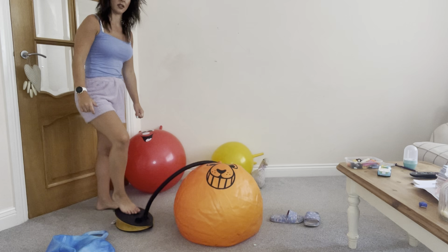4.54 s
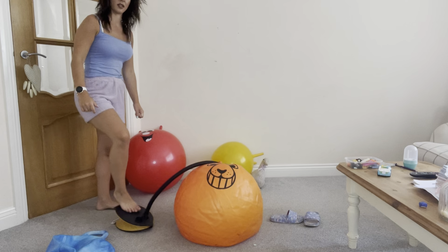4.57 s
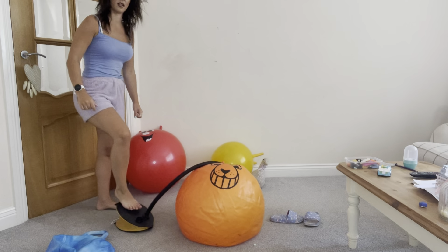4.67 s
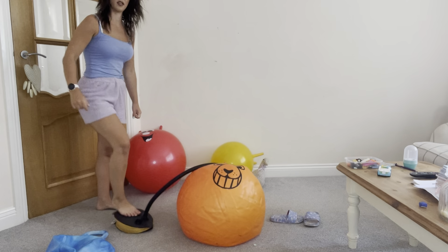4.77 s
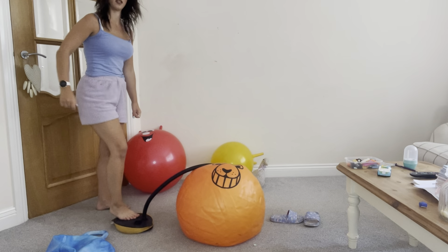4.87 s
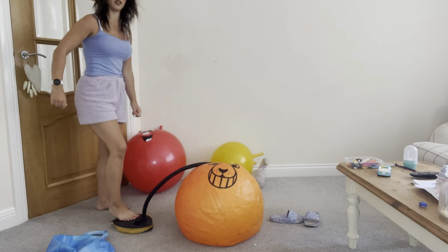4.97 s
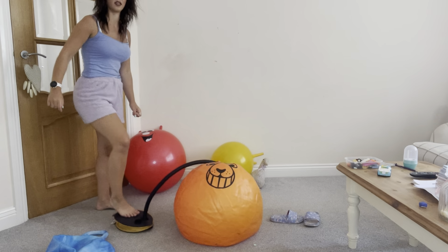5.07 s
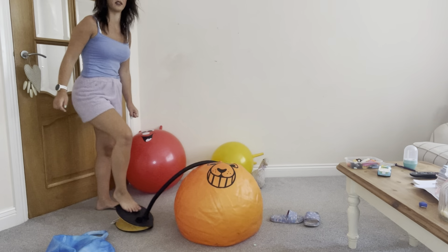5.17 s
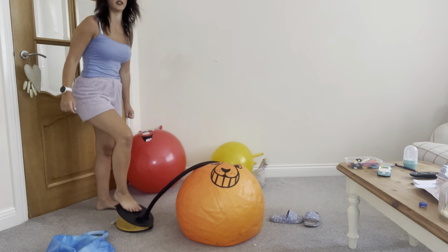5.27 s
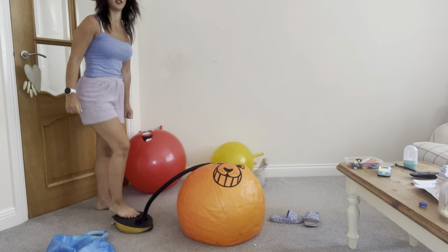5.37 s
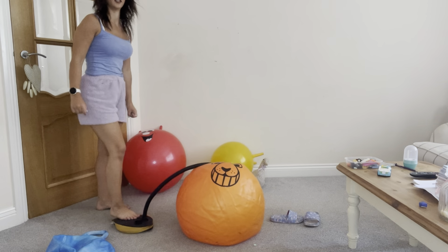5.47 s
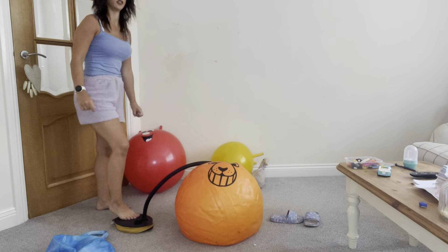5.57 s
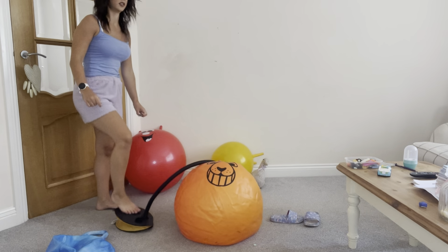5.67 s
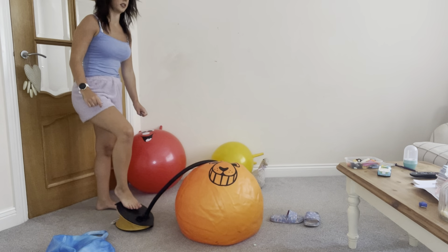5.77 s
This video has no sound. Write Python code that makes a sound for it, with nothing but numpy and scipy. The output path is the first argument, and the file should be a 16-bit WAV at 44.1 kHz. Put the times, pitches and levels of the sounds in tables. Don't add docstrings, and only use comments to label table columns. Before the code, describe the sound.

A foot-operated bellows pump is heard close up in a small carpeted, furnished room with a short reverberation. The rhythm is already under way: presses land at about 0.1, 0.7, 1.3, 1.9, 2.4, 3.0, 3.6, 4.1, 4.7 and 5.3 seconds. Each begins with a blunt hollow knock, mostly low-mid and boxy, with a short rattle and a dull floor thump, while a small puff opens into a bright, steady hiss lasting roughly a quarter second. Between them, from about 0.4 until 5.6 seconds, each release brings a softer snap of folds and a hollow, lumpy whoosh of air sucked in, duller and lower than the outgoing hiss. Stamps vary slightly; the one near 3.0 is hardest, with the loudest outgoing puff, and the puff at 1.9 is faint. The pump sits a little left in stereo over faint low house noise, with pumping continuing to the end.

```python
import sys
import numpy as np
from scipy import signal
from scipy.fft import rfft, irfft, next_fast_len
from scipy.io import wavfile

SR = 44100
rng = np.random.default_rng(int(sys.argv[2]) if len(sys.argv) > 2 else 0)


def elevation(decibels):
    levels = np.asarray(decibels, float)
    return 10 ** (levels / 20)


def transcribe(signal):
    frames = np.atleast_2d(signal).T
    limited = np.clip(frames, -1, 1)
    pcm = np.round(limited * 32767).astype(np.int16)
    wavfile.write(sys.argv[1], SR, pcm)


N = 257103

# f/Hz, bandwidth/Hz, level/dB
CAVITY_MODES = [(249, 44.6, 1), (382, 61, -4.5), (431.6, 79, -3.5), (565, 48, -2.5), (684, 129, -6.5),
                (796.6, 78, -3.5), (941, 30, -10), (1145, 144, -12.5), (1380, 148, -14.5), (1957, 255, -18),
                (1914, 168, -19)]
# f/Hz, T60/s
REVERBERATION = [(100, 0.61), (500, 0.19), (2000, 0.2), (8000, 0.21), (16000, 0.12)]
# outlet flap opens t/s, stamp level/dB, flap puff peak level/dB, push level/dB,
# stroke length/usual length
DOWN_STROKES = [
    (0.068, -1.5, -30.5, -0.5, 1.146),
    (0.6694, -1, -28, 0.5, 1.04),
    (1.284, 0, -27.5, 0, 1.01),
    (1.872, -1, -36.5, -0.5, 1.09),
    (2.4433, 2.5, -28, -0.5, 1.035),
    (3.018, 4.5, -25.5, -0.5, 1.05),
    (3.563, 1, -31, 0, 1.01),
    (4.124, 1, -29.5, 0, 1.045),
    (4.712, -1, -31, -0.5, 1.034),
    (5.285, 1.5, -28.5, -1.5, 1.016),
]
# inlet flap opens t/s, gulp level/dB, flap puff peak level/dB, suction level/dB,
# lead of the folds over the flap t/s
UP_STROKES = [(-0.15, -3.5, -40, -1, 0.03), (0.4355, -0.5, -49, -1, 0.05), (1.062, -2.5, -24, -0.5, 0.069),
              (1.6496, -2, -26.5, -1, 0.045), (2.233, -1.5, -27.5, -1, 0.062), (2.8, -2, -36, 0, 0.049),
              (3.3474, -3.5, -29.5, -3.5, 0.048), (3.901, -1, -34.5, -1.5, 0.049),
              (4.491, -4, -30, -1.5, 0.055), (5.0544, -2, -47, -4, 0.032), (5.6116, -7, -30, -1, 0.018)]


def rms_one(x):
    return x / np.sqrt(np.mean(x ** 2) + 1e-20)


def envelope(rows):
    s, level_db = np.transpose(rows)
    return elevation(np.interp(np.arange(N) / SR, s, level_db))


def at_hz(points, hz):
    f, value = np.array(points)[:, :2].T
    return np.interp(np.log(np.maximum(hz, 1)), np.log(f), value)


def drift(rate):
    every = 40
    r = np.exp(-2 * every * np.pi * rate / SR)
    settle = 2000
    slow = signal.lfilter([1], [1, -2 * r, r * r], rng.standard_normal(N // every + settle + 2))
    slow = rms_one(slow[settle:])
    return np.interp(np.arange(N) / every, np.arange(len(slow)), slow)


def resonate(x, hz, width):
    r = np.exp(-np.pi * width / SR)
    poles = [1, -2 * r * np.cos(2 * np.pi * hz / SR), r * r]
    return signal.lfilter(np.array([1, 0, -1]) * (1 - r * r) / 2, poles, x + 1e-18)


def coloured(x, spectrum):
    size = next_fast_len(N)
    gain = elevation(at_hz(spectrum, np.fft.rfftfreq(size, 1 / SR)))
    return rms_one(irfft(rfft(x, size) * gain, size)[:N])


def swell(start_s, strength_db, delay_s, peak_db, rise_db, attack_s, hold_s, fall_db, bend,
          ease=2, pace=1, early_s=0):
    t = np.arange(0, N / SR + .01, .002)[:, None]
    t = (t - start_s - delay_s + early_s) / pace
    attack = attack_s + early_s
    silence = 8000 * np.maximum(-t, 0)
    rising = rise_db * np.clip(1 - t / attack, 0, 1) ** ease + silence
    falling = fall_db * (10 * np.maximum(t - attack - abs(hold_s), 0)) ** bend
    return np.sum(elevation(2 * (peak_db + strength_db - rising - falling)), axis=1)


def as_rows(power):
    return np.transpose([.002 * np.arange(len(power)), 10 * np.log10(power + 1e-11)])


def strokes():
    down, stamp_db, _, push_db, pace = np.transpose(DOWN_STROKES)
    up, gulp_db, _, suck_db, early = np.transpose(UP_STROKES)

    stamp = dict(delay_s=-0.018, peak_db=-27.5, rise_db=22, attack_s=0.023, hold_s=0.034,
                 fall_db=29, bend=0.84, ease=1.2)
    squeeze = dict(delay_s=0.037, peak_db=-39, rise_db=0, attack_s=0.045, hold_s=0.043,
                   fall_db=12.5, bend=0.53)
    gulp = dict(delay_s=-0.0059, peak_db=-26, rise_db=20.5, attack_s=0.024, hold_s=0.0098,
                fall_db=10.5, bend=1, ease=1.67)
    cavity = swell(down, stamp_db, **stamp)
    cavity += swell(down, push_db, **squeeze, pace=pace)
    cavity += swell(up, gulp_db, **gulp, early_s=abs(early))

    outlet = dict(delay_s=0.0024, peak_db=-38, rise_db=19.5, attack_s=0.1, hold_s=0.035,
                  fall_db=6.5, bend=0.86)
    inlet = dict(delay_s=-0.0078, peak_db=-38, rise_db=13, attack_s=0.023, hold_s=0.039,
                 fall_db=12.5, bend=1.86)
    valve = swell(down, push_db, **outlet, pace=pace) + swell(up, suck_db, **inlet)

    blow = dict(delay_s=0.0016, peak_db=-37.5, rise_db=31.5, attack_s=0.098, hold_s=0.062,
                fall_db=15.5, bend=1.02)
    backdraught = dict(delay_s=-0.005, peak_db=-52, rise_db=12.5, attack_s=0.082, hold_s=0.0075,
                       fall_db=23, bend=0.93)
    jet = swell(down, push_db, **blow, pace=pace) + swell(up, suck_db, **backdraught)

    heel_down = dict(delay_s=-0.007, peak_db=-38, rise_db=15, attack_s=0.051, hold_s=0.025,
                     fall_db=14.5, bend=0.44)
    heel_up = dict(delay_s=-0.039, peak_db=-36.5, rise_db=29, attack_s=0.069, hold_s=0.047,
                   fall_db=11.5, bend=1.04)
    floor = swell(down, 0.11 * stamp_db, **heel_down) + swell(up, 1.2 * gulp_db, **heel_up)

    drone_down = dict(delay_s=-0.013, peak_db=-50.5, rise_db=-3, attack_s=0.1, hold_s=0.059,
                      fall_db=0.5, bend=1.7)
    drone_up = dict(delay_s=0.014, peak_db=-44, rise_db=27, attack_s=0.068, hold_s=0.018,
                    fall_db=10.5, bend=1.5)
    drone = swell(down, 1.4 * stamp_db, **drone_down) + swell(up, 0.7 * gulp_db, **drone_up)
    return [as_rows(power) for power in (cavity, valve, jet, floor, drone)]


def background():
    # f/Hz, spectral density level/dB
    house_spectrum = [(18, -33), (30, 30), (65, 22), (311, 35), (393, 22), (786, 32), (3870, -48),
                      (7360, -36), (14000, -59)]
    mid = coloured(rng.standard_normal(N), house_spectrum)
    side = coloured(rng.standard_normal(N), house_spectrum)
    return elevation(-54) * np.array([mid + 0.8 * side, mid - 0.37 * side])


def rumble(rows, modes, lumpy_db):
    shake = rng.standard_normal(N) * elevation(lumpy_db * drift(19))
    ringing = 0
    for hz, width, db in modes:
        ringing = ringing + elevation(db) * resonate(resonate(shake, hz, width), hz, 3 * width)
    return envelope(rows) * rms_one(ringing)


def room_drone(drone_db):
    # f/Hz, bandwidth/Hz, level/dB
    room_modes = [(45.6, 19.6, 2.5), (62, 3, 6.5)]
    drone = rumble(drone_db, room_modes, lumpy_db=-1.5)
    across = elevation(-13) * rumble(drone_db, room_modes, lumpy_db=-5) * np.array([[1], [-1]])
    return drone, across


def floor_thud(floor_db):
    # f/Hz, bandwidth/Hz, level/dB
    floor_modes = [(110, 87, 6.5), (134.2, 20, 4.5)]
    return rumble(floor_db, floor_modes, lumpy_db=1.5)


def turbulence(rows, spectrum, patchy_db, rate):
    # f/Hz, level re direct/dB
    echo_level = [(1000, 4), (3000, 5), (5500, 3), (7000, -5), (8000, -6), (16000, -4)]
    size = next_fast_len(N)
    noise = np.array([rfft(coloured(white, spectrum), size) for white in rng.standard_normal((3, N))])
    half_octave = 2 * np.log2(np.fft.rfftfreq(size, 1 / SR) + 1)
    together = drift(rate)
    effort = envelope(rows)
    direct, echo = 0, 0
    for band in range(18, 29):
        crossfade = np.clip(1 - abs(half_octave - band), 0, 1)
        part = irfft(noise * crossfade, size)[:, :N]
        gain = effort * elevation(patchy_db * (together + 0.86 * drift(rate)))
        hz = 2 ** (band / 2)
        keep = elevation(-120 / at_hz(REVERBERATION, hz) / SR)
        stored = signal.lfilter([1 - keep], [1, -keep], gain ** 2)
        direct = direct + part[0] * gain
        echo = echo + part[1:] * np.sqrt(stored) * elevation(at_hz(echo_level, hz))
    return direct, echo


def nozzle_jet(jet_db):
    # f/Hz, spectral density level/dB
    jet_spectrum = [(2000, -6.5), (4000, -2), (6000, 2.5), (6900, 4.5), (7350, -2.5), (7900, 4.5),
                    (10500, 5), (12500, 3), (15000, 1), (17000, -23)]
    return turbulence(jet_db, jet_spectrum, patchy_db=0.47, rate=35)


def valve_hiss(valve_db):
    # f/Hz, spectral density level/dB
    valve_spectrum = [(700, -6), (1200, 1), (1650, 0), (1870, 4.5), (2100, -1.5), (2300, -2.5),
                      (2480, -1.5), (2700, -2.5), (3500, -3), (4500, -3), (4900, -8), (7000, -8),
                      (9000, -24)]
    return turbulence(np.add(valve_db, [0, -5]), valve_spectrum, patchy_db=1.68, rate=6.2)


def flaps():
    # f/Hz, spectral density level/dB
    puff_spectrum = [(1200, 11), (2200, 4.5), (4500, 0), (6000, -4), (10000, -8.5), (16000, -25)]
    puffs = 0
    for rows, decay_ms in (DOWN_STROKES, 19.6), (UP_STROKES[1:], 30):
        s, _, db, *_ = np.transpose(rows)
        kicks = np.zeros(N) + 1e-18
        kicks[np.round(s * SR).astype(int)] = elevation(db - 7)
        puffs = puffs + signal.lfilter([1], [1, -np.exp(-1000 / decay_ms / SR)], kicks)
    opens_ms = 1.55
    lag = np.exp(-1000 / opens_ms / SR)
    return signal.lfilter([1 - lag], [1, -lag], puffs) * coloured(rng.standard_normal(N), puff_spectrum)


def inlet_opening(s, level_db):
    since = s[:, None] - np.array(UP_STROKES)[:, 0]
    fade_s = 0.029
    fresh = np.sum((since > 0) * np.exp(-abs(since) / fade_s), axis=1)
    return np.clip(-1 - 0.22 * (level_db + 35.5) + 5.5 * fresh, -8, 12)


def cavity_air(rows, lumpy_db, wander_db):
    s, level_db = np.transpose(rows)
    opening = np.interp(np.arange(N) / SR, s, inlet_opening(s, level_db))
    flow = rng.standard_normal(N) * elevation(lumpy_db * drift(50))
    flow = signal.sosfilt(signal.butter(2, 2700, fs=SR, output="sos"), flow)
    whoosh = 0
    for k, (hz, width, db) in enumerate(CAVITY_MODES):
        wander = wander_db * np.tanh(drift(12.7))
        gain = elevation(db + wander + opening * np.log2(hz / 400))
        whoosh = whoosh + (-1) ** k * gain * resonate(flow, hz, max(width, hz / 9))
    return envelope(rows) * elevation(-1.5) * whoosh / 0.12


def knocks(favour_db):
    # t/s, peak level/dB, strongest ring f/Hz, rattle t/ms
    press_snaps = [(0.077, -14, 535, 10), (0.662, -19, 276, 6), (0.676, -23, 280, 6.8),
                   (0.708, -15, 300, 3), (1.281, -22, 700, 7), (1.290, -15.5, 474, 3.1),
                   (1.854, -24.5, 740, 5.1), (1.873, -17.5, 229, 2.3), (2.453, -19.5, 714, 21),
                   (2.486, -21.5, 300, 3.5), (3.000, -21.5, 526, 4.9), (3.023, -9.5, 398, 8.5),
                   (3.046, -21, 820, 2.6), (3.563, -20, 560, 5), (3.571, -13.5, 525, 7.6),
                   (4.123, -24, 420, 10), (4.131, -17.5, 300, 9), (4.161, -12, 425, 2.8),
                   (4.701, -26, 756, 6.8), (4.717, -14.5, 400, 8), (4.749, -18.5, 258, 4.6),
                   (5.278, -18.5, 760, 6), (5.287, -14, 530, 12)]
    # t/s, peak level/dB, strongest ring f/Hz, rattle t/ms
    release_snaps = [(0.452, -16.5, 406, 7.6), (1.026, -32, 467, 11), (1.059, -18.5, 795, 5.1),
                     (1.159, -25.5, 226, 4.4), (1.621, -26.5, 455, 6), (1.631, -20.5, 468, 6.9),
                     (1.668, -13.5, 256, 8), (2.221, -23.5, 256, 6.6), (2.248, -14, 540, 5.2),
                     (2.770, -29, 471, 3.9), (2.822, -18.5, 560, 5.1), (3.316, -23, 280, 11),
                     (3.366, -14.5, 550, 5.9), (3.869, -26, 554, 4.5), (4.485, -24, 470, 4.4),
                     (4.515, -24, 695, 8.3), (5.029, -27.5, 616, 6.8), (5.084, -16.5, 530, 8),
                     (5.586, -25.5, 470, 9.2), (5.635, -17.5, 453, 13)]
    t = np.arange(int(.07 * SR)) / SR
    out = np.zeros(N + len(t))
    blunt = signal.butter(2, 1650, fs=SR, output="sos")
    fade = np.cos(t / t[-1] * np.pi / 2)
    for s, db, ring_hz, rattle_ms in press_snaps + release_snaps:
        push, chance = rng.standard_normal((2, len(t)))
        push = push * (abs(chance) > 2.2)
        push[0] = 2.25
        push = push * np.exp(-t * 1000 / np.clip(rattle_ms, 1, 20))
        push = signal.sosfilt(blunt, push)
        body = 0
        for k, (hz, width, mode_db) in enumerate(CAVITY_MODES):
            favour = favour_db * np.exp(-(np.log(hz / ring_hz) / .22) ** 2)
            body = body + (-1) ** k * elevation(mode_db + favour) * resonate(push, hz, 1.4 * width)
        i = round(s * SR)
        out[i:i + len(t)] += elevation(min(db, -6.5) - 2.1) * body * fade / abs(body).max()
    return out[:N]


def heard(solid, air):
    # f/Hz, level re direct/dB
    tail_level = [(100, -27), (400, -0.5), (1500, 0.5), (5000, -9), (12000, 2)]
    # f/Hz, left-right level/dB
    left_bias = [(60, 3), (125, 3), (300, 3.3), (700, 3.5), (2000, 2.5), (8000, -0.5)]
    size = next_fast_len(N + SR)
    hz = np.fft.rfftfreq(size, 1 / SR)
    t = np.arange(SR // 2) / SR
    tails = 0
    octaves = 60 * 2. ** np.arange(9)
    for low, high in zip(octaves, octaves[1:]):
        mid_hz = np.sqrt(low * high)
        bandpass = signal.butter(2, [low, high], "band", fs=SR, output="sos")
        band = signal.sosfilt(bandpass, rng.standard_normal((2, len(t))))
        tail = band * elevation(-60 * t / at_hz(REVERBERATION, mid_hz)) * (t > .004)
        energy = np.sum(tail ** 2, axis=1, keepdims=True)
        share = (high - low) / SR * 2
        tails = tails + tail * elevation(at_hz(tail_level, mid_hz)) * np.sqrt(share / energy)
    bias = elevation(at_hz(left_bias, hz) / 2)
    solid_lag_s, air_lag_s = 58e-6, 82e-6
    solid_path = np.array([bias, np.exp(-2j * np.pi * hz * solid_lag_s) / bias])
    air_path = np.array([bias, np.exp(-2j * np.pi * hz * air_lag_s) / bias])
    spectrum = rfft(air, size) * air_path + rfft(solid, size) * (solid_path + rfft(tails, size))
    return irfft(spectrum, size)[:, :N]


def scene():
    cavity_db, valve_db, jet_db, floor_db, drone_db = strokes()
    drone, across = room_drone(drone_db)
    floor = floor_thud(floor_db) + drone
    jet, jet_echo = nozzle_jet(jet_db)
    valve, valve_echo = valve_hiss(valve_db)
    bellows = cavity_air(cavity_db, lumpy_db=1.5, wander_db=2.5) + knocks(favour_db=6)
    bellows = signal.sosfilt(signal.butter(2, 170, "high", fs=SR, output="sos"), bellows)
    bellows = bellows + flaps()
    return heard(bellows + floor, valve + jet) + across + valve_echo + jet_echo + background()


def band_limit(x):
    return signal.sosfilt(signal.butter(12, 16250, fs=SR, output="sos"), x)


def record(dry):
    cut = signal.sosfilt(signal.butter(6, 38, "high", fs=SR, output="sos"), dry)
    cut = signal.sosfilt(signal.cheby2(16, 40, 16400, fs=SR, output="sos"), cut)
    mix = .6 * np.tanh(cut / .6)
    return band_limit(mix)


dry = scene()
out = record(dry)
transcribe(out)
```